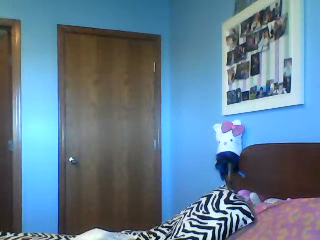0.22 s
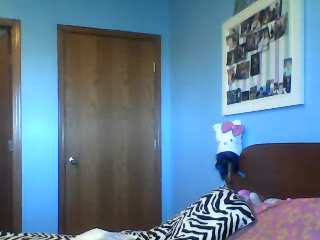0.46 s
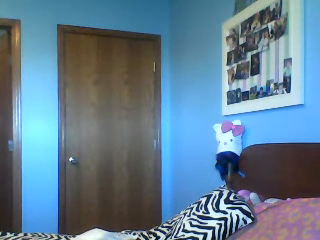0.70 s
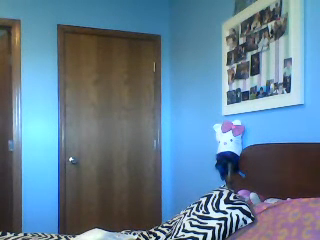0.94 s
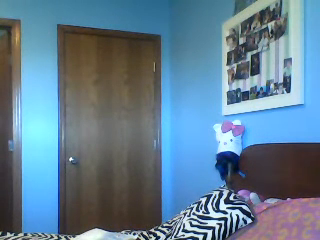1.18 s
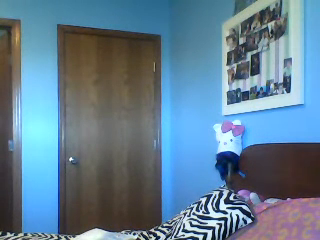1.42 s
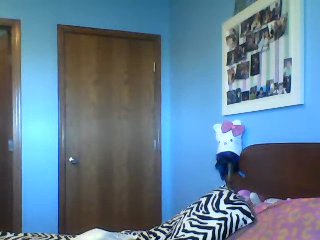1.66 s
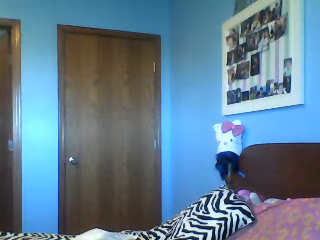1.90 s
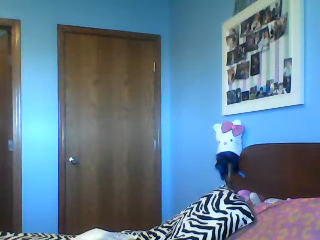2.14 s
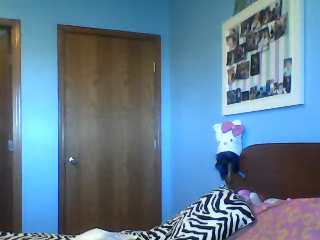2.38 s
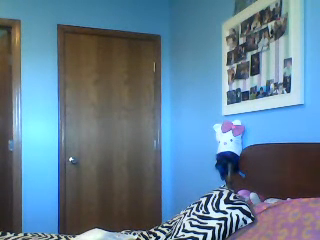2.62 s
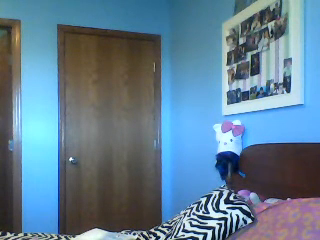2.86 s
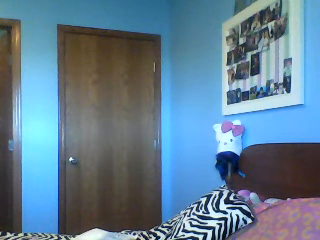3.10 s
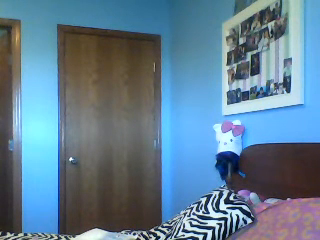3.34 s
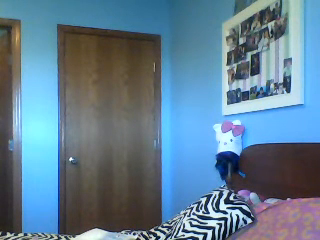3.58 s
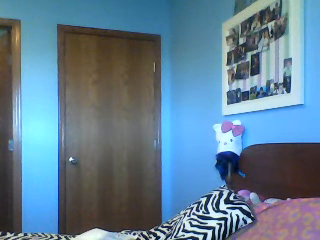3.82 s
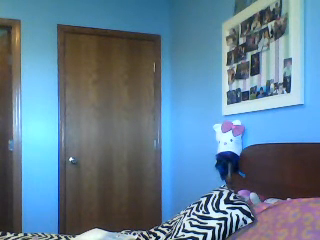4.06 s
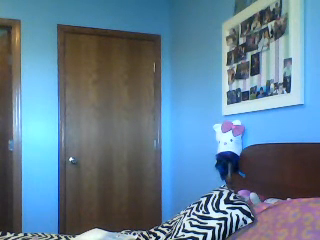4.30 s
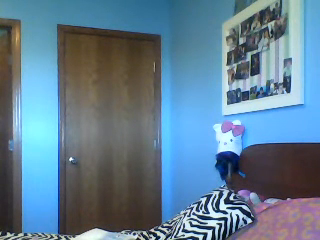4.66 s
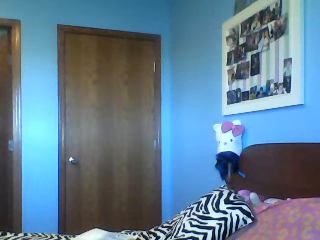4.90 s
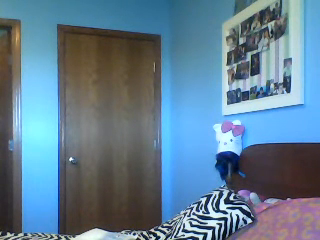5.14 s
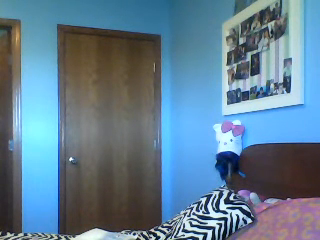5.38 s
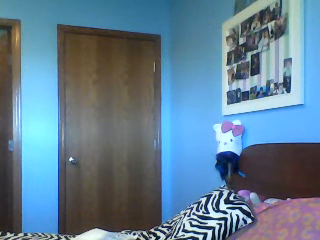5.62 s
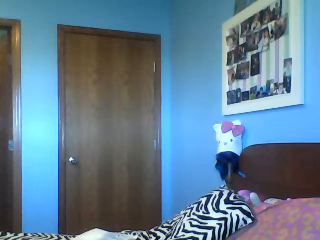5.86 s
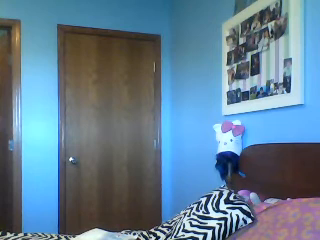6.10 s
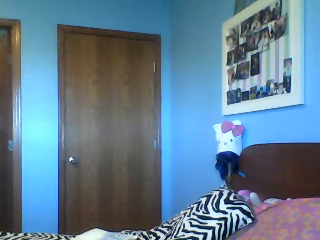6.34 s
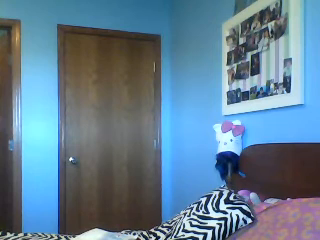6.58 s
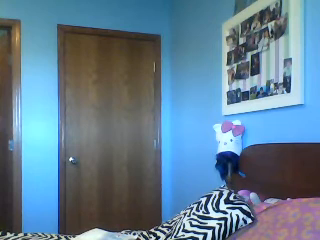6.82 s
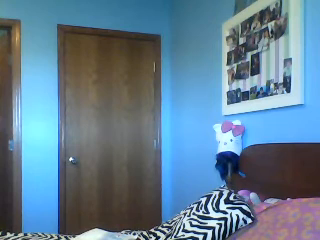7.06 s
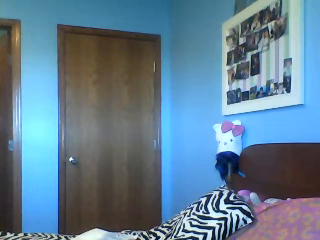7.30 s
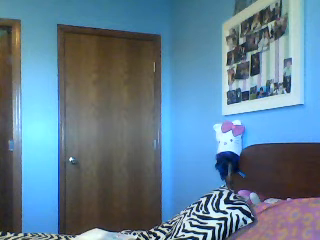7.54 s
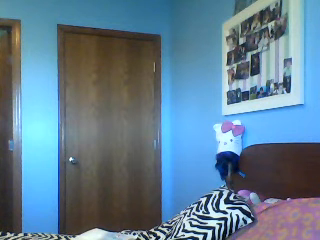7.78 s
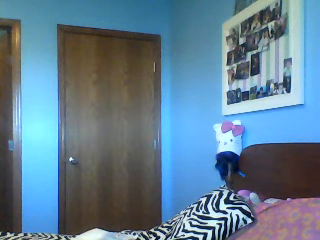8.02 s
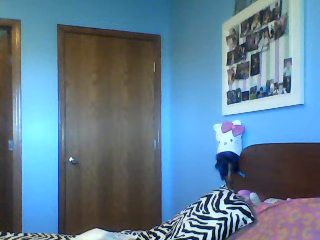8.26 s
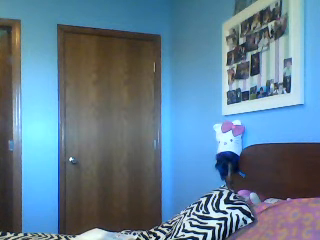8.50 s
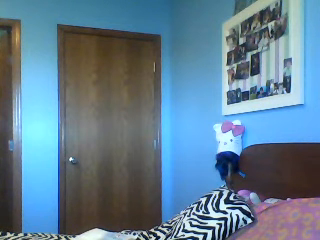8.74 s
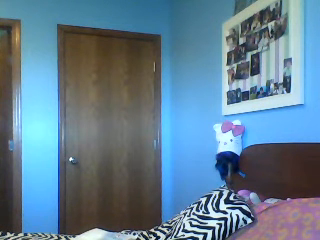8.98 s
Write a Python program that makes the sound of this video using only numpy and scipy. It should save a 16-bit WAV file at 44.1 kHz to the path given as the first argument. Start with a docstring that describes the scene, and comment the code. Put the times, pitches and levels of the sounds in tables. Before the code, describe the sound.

Soft cloth rustles over faint room hum, then hangers clack together, hooks scrape and squeal along a closet rail, with dull muffled bumps.

```python
"""Soft cloth rustles first, over faint room air and a mains hum: dresses on hangers are sorted in a closet.
Then hangers knock together, each blow ringing the body, arms and wire hook, and cushioned bumps thud.
Hooks scrape along the rail in streams of tiny slips, and creak and squeal as they stick and slip.
The rail rumbles faintly under the moving load; all is heard from the bedroom of a quiet house."""
import sys
import numpy as np
from scipy import signal
from scipy.fft import rfft, irfft, next_fast_len
from scipy.io import wavfile
from scipy.ndimage import uniform_filter1d

SR = 44100
rng = np.random.default_rng(int(sys.argv[2]) if len(sys.argv) > 2 else 0)


def transcribe(signal):
    """Save signal, clipped to [-1, 1], as a 16-bit WAV file at the path in sys.argv[1]."""
    frames = np.atleast_2d(signal).T
    limited = np.clip(frames, -1, 1)
    pcm = np.round(limited * 32767).astype(np.int16)
    wavfile.write(sys.argv[1], SR, pcm)


N = 404882
TIME = np.arange(N) / SR

# Levels in the tables are relative: each source's own gain is added to them.
# hangers knocking: (time [s], body level [dB], arms level [dB], wire hook level [dB])
KNOCKS = [(1.483, -62, -65, -48), (1.497, -47, -47, -73), (1.548, -51.5, -51, -56),
          (1.622, -48.5, -46.5, -38), (1.632, -45, -45, -39), (1.671, -46, -49, -54),
          (1.718, -49, -45.5, -48.5), (1.753, -51.5, -53, -66), (1.773, -68, -50, -51),
          (2.189, -83, -73.5, -72), (2.527, -52, -48.5, -51.5), (3.326, -85, -73, -73),
          (3.439, -72, -78, -70.5), (3.468, -51, -49.5, -51), (3.492, -50, -73, -82),
          (3.563, -46, -66, -81), (3.607, -54, -52, -73), (3.66, -52, -62, -80), (3.714, -40.5, -52, -80),
          (3.792, -56, -59, -79), (3.843, -72, -59, -77), (3.92, -45, -59, -67.5), (3.978, -69, -64.5, -77),
          (4.06, -47, -50, -40.5), (4.544, -65, -76, -72), (4.849, -53, -50.5, -68), (4.875, -53, -48, -53),
          (5.038, -77, -68.5, -75.5), (5.227, -62, -74, -80), (6.112, -68, -70, -79),
          (6.632, -75.5, -71, -84), (6.71, -74.5, -66, -77), (7.675, -75, -66, -82), (8.512, -81, -78, -72),
          (8.586, -54, -65, -68), (8.69, -59, -61, -70)]
# how a hanger's body, arms and wire hook ring: (frequency [Hz], width [Hz], level [dB])
BODY_MODES = [(1000, 150, -6.5), (1460, 150, -7), (1714, 99, 0.5), (1898, 150, -1.5), (2103, 140, -3.5)]
ARM_MODES = [(2470, 110, -2.5), (2727, 170, -1.5), (3130, 390, -5), (3610, 280, -1.5), (4020, 300, -6.5)]
HOOK_MODES = [(4400, 220, -3), (5170, 400, -4.5), (5332, 250, 0), (5740, 120, 0.5), (6110, 190, 1.5),
              (6680, 400, -0.5), (7250, 400, -6.5)]
# the rail, set ringing through the wire hook: (frequency [Hz], level [dB], time to fall 60 dB [s])
RAIL_MODES = [(1598, -13.5, .3), (1707, -11, 0.33), (2090, -14, .22), (2370, -10.5, .18)]
# hooks pushed along the rail:
# (start [s], length [s], body level [dB], arms level [dB], wire hook level [dB])
PUSHES = [(1.795, .07, -56, -57.5, -56), (2.548, .087, -48.5, -47.5, -42.5), (2.655, .04, -49, -51, -48),
          (2.757, .036, -52.5, -54, -81), (3.55, .015, -48, -56, -67), (3.612, .033, -49, -58, -80),
          (3.8, .01, -55, -60, -77), (4.033, .027, -48, -51, -75), (4.066, .035, -49.5, -54, -47),
          (4.125, .05, -51, -53, -54), (4.195, .01, -52, -53, -76), (4.258, .025, -58, -60, -79),
          (4.886, .018, -53, -55, -60), (6.999, .006, -56, -68, -80), (7.028, .066, -45, -47.5, -45)]
# how long body, arms and wire hook take to fall 60 dB once the hook stops: one time [s] each
PUSH_RELEASE_S = [.24, .11, .09]
# dry friction under the ringing: (frequency [Hz], level per Hz [dB])
FRICTION_COLOUR = [(100, -1), (300, -2.5), (550, -4.5), (800, 0.5), (1300, 0.5), (2400, -5), (3600, -13),
                   (8000, -39)]
# hook creaking with overtones, and squealing on a single mode:
# (time of the top [s], pitch [Hz], level [dB], rise to the top from 1/e [s], fall by 60 dB [s])
CREAKS = [(2.572, 903, -40, 0.03, 0.11), (2.622, 903, -43.5, 0.04, 0.25), (2.672, 883, -45.5, 0.019, 0.19),
          (2.772, 785, -51.5, 0.035, 0.12), (4.051, 917, -51, 0.014, .22)]
SQUEALS = [(1.504, 2595, -47, .008, .075), (1.858, 6677, -30.5, .04, .155), (1.932, 2750, -62, .008, .05),
           (2.578, 3668, -25.5, .02, .1), (2.625, 3658, -37, .015, .2), (2.65, 4400, -36.5, .005, .15),
           (2.772, 3820, -49.5, .032, .06), (3.556, 1830, -49.5, .034, .24), (3.558, 3720, -51, .009, .06),
           (3.613, 3680, -50, .007, .045), (3.722, 2465, -48, .007, .07), (3.846, 2600, -57, .003, .035),
           (3.926, 2460, -54, .007, .06), (4.05, 3630, -38.5, .012, .05), (4.05, 2708, -37.5, .012, .075),
           (4.072, 1820, -45.5, .027, .17), (4.074, 5210, -37.5, .006, .11), (4.135, 5520, -44, .035, .12),
           (4.14, 4970, -41, .012, .12), (4.168, 4900, -42.5, .022, .09), (4.277, 3020, -46.5, .017, .075),
           (4.283, 5980, -60, .009, .055), (4.851, 2705, -50.5, .003, .09), (4.879, 2500, -44.5, .005, .12),
           (7.038, 3680, -40.5, .007, .045), (7.039, 2720, -42.5, .009, .075),
           (7.087, 2256, -44, .007, .14), (8.603, 1630, -54, .012, .15), (8.604, 2065, -53.5, .009, .065)]
# how strongly a hanger radiates the overtones of a creak: (frequency [Hz], level [dB])
CREAK_COLOUR = [(800, 2.5), (1300, -10), (1800, -2), (2400, -0.5), (2750, -3.5), (3150, -1), (3700, -3.5),
                (4600, -19), (5450, -12), (6300, -19.5), (7300, -22.5)]
# dresses brushing past one another: (time of the top [s], level [dB], length [s])
BRUSHES = [(.26, -73, .4), (.39, -68, .3), (.57, -72, .35), (.78, -75, .2), (1.38, -71, .12),
           (2.11, -68, .25), (2.35, -70, .3), (3.35, -73, .25), (4.36, -70, .2), (4.49, -70, .25),
           (4.56, -68, .2), (4.705, -66, .18), (5.19, -70, .2), (5.59, -66, .4), (5.72, -67, .4),
           (6.135, -64, .25), (6.385, -65, .25), (6.73, -68, .2), (7.7, -67, .3), (7.96, -71, .35),
           (8.09, -68, .35), (8.53, -69, .25), (8.702, -56, .1), (8.87, -71, .3)]
# tone colour of the cloth: (frequency [Hz], level per Hz [dB])
CLOTH_COLOUR = [(200, -11.5), (700, -3.5), (1800, 3.5), (3000, 0.5), (4500, -5.5), (7000, -10),
                (9000, -13.5)]
# soft bumps of the clothes against the closet: (time [s], level [dB])
BUMPS = [(0.556, -53.5), (1.075, -53), (1.114, -55), (1.688, -43), (1.731, -48), (1.85, -45), (3.595, -46),
         (4.117, -47), (4.2, -47), (4.885, -45)]
# the load swings and the rail rumbles: (time of the top [s], level [dB], length [s])
SWINGS = [(1.18, -55, .5), (1.7, -51, .12), (1.855, -45, .1), (2.555, -45, .11), (2.82, -56, .2),
          (3.62, -46, .3), (3.8, -50, .25), (4.22, -43.5, .4), (4.6, -61, .6), (4.885, -43.5, .16),
          (7.06, -37.5, .25), (7.96, -48, .45), (9.03, -57.5, .7)]
# tone colour of that rumble: (frequency [Hz], level per Hz [dB])
SWAY_COLOUR = [(12, -16.5), (23, 1.5), (34, -5), (49, 2), (68, -11), (130, -17), (280, -22.5), (600, -47)]
# tone colour of the room air: (frequency [Hz], level per Hz [dB])
AIR_COLOUR = [(12, -31.5), (20, -1.5), (61, 0.5), (116, -4), (285, -12.5), (367, -9), (428, -13),
              (474, -12), (539, -13.5), (628, -10.5), (770, -16), (944, -15.5), (1830, -21.5),
              (6570, -35.5), (8930, -56), (11600, -88), (19600, -120)]
# steady tones of the mains hum: (frequency [Hz], rms level [dB])
HUM_TONES = [(120, -77), (240, -83), (360, -82.5), (480, -75.5)]


def knocks(body_db, arms_db, hook_db, thud_db, thud_hz, crack_db, crack_hz):
    """Each knock cracks and rings a hanger's body, arms and wire hook; the hook passes it on to the rail."""
    out = np.zeros(N + SR)
    for s, body, arms, hook in KNOCKS:
        echo = closet(low_t60=.28, high_t60=.12, split_hz=1800, direct_db=-8.5)
        contact = closet(low_t60=.17, high_t60=.1, split_hz=3000, direct_db=-2.5)
        thud = from_db(thud_db) * butter(contact, thud_hz, "low")
        crack = from_db(crack_db) * butter(contact, crack_hz, "high")
        body_ring = unit_blow(resonate(echo, uneven(BODY_MODES, spread_db=-1.0)) + thud)
        arms_ring = unit_blow(resonate(echo, uneven(ARM_MODES, spread_db=2.0)))
        hook_ring = unit_blow(resonate(echo, uneven(HOOK_MODES, spread_db=1.5)) + crack)
        blow = from_db(body + body_db) * body_ring
        blow += from_db(arms + arms_db) * arms_ring
        blow += from_db(hook + hook_db) * (hook_ring + rail_ring())
        at = round(s * SR)
        out[at:at + len(blow)] += blow
    return out[:N]


def rail_ring():
    """The rail rings in a few dying tones."""
    t, ring = TIME[:SR // 2], 0
    for hz, db, t60 in RAIL_MODES:
        tone = np.sin(2 * np.pi * (hz * t + rng.random()))
        ring = ring + np.sqrt(2) * from_db(db - 60 * t / t60) * tone
    return ring


def uneven(modes, spread_db):
    """Where a blow lands decides how strongly each mode answers; here that is left to chance."""
    return [(hz, width, db + spread_db * rng.standard_normal()) for hz, width, db in modes]


def scrapes(ring_db, friction_db, arms_db, hook_db, hiss_db, hiss_hz):
    """A sliding hook rings body, arms and wire, and rubs dryly on the rail."""
    drive, rub = grit(), grit()
    body = from_db(ring_db) * rms_one(resonate(drive, BODY_MODES))
    body += from_db(friction_db) * coloured(rub, FRICTION_COLOUR)
    arms = from_db(arms_db) * rms_one(resonate(drive, ARM_MODES))
    wire = from_db(hook_db) * rms_one(resonate(grit(), HOOK_MODES))
    wire += from_db(hiss_db) * rms_one(butter(rub, hiss_hz, "high"))
    return body * pressure(part=0) + arms * pressure(part=1) + wire * pressure(part=2)


def grit():
    """A stream of slips, blurred by the closet; the hand keeps an even pressure."""
    echo = closet(low_t60=.25, high_t60=.13, split_hz=3000, direct_db=2.5)
    stream = signal.fftconvolve(slips(per_s=650, spread_db=4.0), echo)[:N]
    mean_power = uniform_filter1d(stream ** 2, SR // 25)  # over 40 ms
    return stream / np.sqrt(mean_power + 1e-9)


def pressure(part):
    """Gain of body (0), arms (1) or wire (2): a push bites, bears down most in its middle and rings out."""
    attack_s, arch_db = .065, 1.5  # time to climb 60 dB; extra pressure in mid-push
    t, power = TIME[::40], 0
    for s, length, *parts_db in PUSHES:
        arch = arch_db * np.sin(np.pi * np.clip((t - s) / length, 0, 1))
        before = np.maximum(s - t, 0) / attack_s
        after = np.maximum(t - s - length, 0) / PUSH_RELEASE_S[part]
        gain = from_db(parts_db[part] + arch) * np.exp(-np.log(1000) * (before + after))
        power = power + gain ** 2
    return np.interp(TIME, t, np.sqrt(power))


def creaks():
    """Sticking and slipping makes a row of overtones, coloured by the hanger's resonances."""
    colour_hz, colour_db = np.transpose(CREAK_COLOUR)
    out = 0
    for s, hz, db, rise, fade in CREAKS:
        overtones = np.interp(hz * np.arange(1, 9), colour_hz, colour_db)
        out = out + stick_slip(s, hz, db, rise, fade, rough=.6, overtones_db=overtones,
                               wander_hz=4.7, flutter_rate=230)
    return out


def squeals():
    """Friction tones on one mode each: a loud one locks on to its mode, weaker ones are rougher."""
    out = 0
    for s, hz, db, rise, fade in SQUEALS:
        rough = np.clip(.04 * (-26 - db), .1, .95)  # rougher with each dB below -26
        out = out + stick_slip(s, hz, db, rise, fade, rough, overtones_db=[0],
                               wander_hz=11.0, flutter_rate=600)
    return out


def stick_slip(s, hz, db, rise, fade, rough, overtones_db, wander_hz, flutter_rate):
    """A friction tone swells, then dies ever faster; a rougher grip flutters deeper and quicker."""
    out, start = np.zeros(N), round((s - .15) * SR)
    t = TIME[start:start + SR // 2] - s
    size = len(t)
    push = swell(t, rise, fade)
    phase = 2 * np.pi * np.cumsum(hz + wander_hz * drift(70, size)) / SR
    rough = np.clip(rough, 0, 1)
    for k, overtone_db in enumerate(overtones_db, 1):
        # a complex flutter shakes both loudness and phase
        flutter = drift(flutter_rate * rough, size) + 1j * drift(flutter_rate * rough, size)
        grip = np.sqrt(1 - rough ** 2) + rough * flutter
        tone = np.real(grip * np.exp(1j * (k * phase + 2 * np.pi * rng.random())))
        out[start:start + size] += np.sqrt(2) * from_db(db + overtone_db) * push * tone
    return out


def brushing_cloth(gain_db):
    """Cloth brushes past cloth in fine grains, and stirs faintly between the brushes."""
    grains = coloured(slips(per_s=5800, spread_db=5.0), CLOTH_COLOUR)
    return from_db(gain_db) * grains * swells(BRUSHES, rise_share=.13, rest_db=-84)


def bumps(gain_db, low_hz, top_hz):
    """Cloth cushions these blows, so only a dull thud is left."""
    hits = np.zeros(N)
    for s, db in BUMPS:
        hits[round(s * SR)] = from_db(db + gain_db)
    echo = closet(low_t60=.2, high_t60=.1, split_hz=610, direct_db=-12)
    thud = butter(butter(echo, top_hz, "low"), low_hz, "high")
    return signal.fftconvolve(hits, unit_blow(thud))[:N]


def rumbling_rail(gain_db):
    """The swaying load makes the rail rumble: low noise that swells with each swing."""
    rumble = coloured(rng.standard_normal(N), SWAY_COLOUR)
    return from_db(gain_db) * rumble * swells(SWINGS, rise_share=.18, rest_db=-66)


def room_air(rms_db):
    """Steady room air: noise that is weak in the treble."""
    return from_db(rms_db) * coloured(rng.standard_normal(N), AIR_COLOUR)


def mains_hum(gain_db):
    """A faint mains hum: a few steady tones."""
    hum = 0
    for hz, db in HUM_TONES:
        tone = np.sin(2 * np.pi * (hz * TIME + rng.random()))
        hum = hum + np.sqrt(2) * from_db(db + gain_db) * tone
    return hum


def closet(low_t60, high_t60, split_hz, direct_db):
    """Echo of closet and bedroom: a direct click, then reflections that thicken, their treble dying first."""
    t = TIME[:SR // 2]
    low, high = rng.standard_normal((2, len(t)))
    echo = butter(low, split_hz, "low") * from_db(-60 * t / low_t60)
    echo += butter(high, split_hz, "high") * from_db(-60 * t / high_t60)
    echo *= 1 - np.exp(-t / .00068)
    echo /= np.sqrt(np.sum(echo ** 2))
    echo[0] += from_db(direct_db)
    return echo


def slips(per_s, spread_db):
    """Tiny slips at random moments, a few much stronger than the rest."""
    strength = from_db(spread_db * np.minimum(rng.exponential(1, N), 4))
    sizes = strength * rng.choice([-1, 1], N)
    return sizes * (rng.random(N) < per_s / SR)


def resonate(x, modes):
    """Ring several resonances side by side, with alternating signs."""
    out = 0
    for k, (hz, width, db) in enumerate(modes):
        r = np.exp(-np.pi * width / SR)
        poles = [1, -2 * r * np.cos(2 * np.pi * hz / SR), r * r]
        ring = signal.lfilter([1, 0, -1], poles, x + 1e-18)
        out = out + (-1) ** k * from_db(db) * (1 - r * r) / 2 * ring
    return out


def swell(t, rise, fade):
    """Gain that climbs to its top at t = 0, then dies ever faster."""
    return np.where(t < 0, np.exp(-(t / rise) ** 2), from_db(-60 * (np.abs(t) / fade) ** 1.3))


def swells(events, rise_share, rest_db):
    """Gain of soft movements that rise for a share of their length and fade, over a resting level."""
    t = TIME[::40]
    power = from_db(rest_db) ** 2
    for s, db, length in events:
        power = power + (from_db(db) * swell(t - s, rise_share * length, length)) ** 2
    return np.interp(TIME, t, np.sqrt(power))


def drift(rate, size):
    """Smooth chance: lines between random points, `rate` of them a second."""
    at = np.arange(size) / SR * rate
    return np.interp(at, np.arange(8000), rng.standard_normal(8000))


def coloured(x, spectrum):
    """Give a steady signal a tone colour; rms 1."""
    hz, db = np.transpose(spectrum)
    size = next_fast_len(N)
    grid = np.maximum(np.arange(size // 2 + 1) * SR / size, 1)
    gain = from_db(np.interp(np.log(grid), np.log(hz), db))
    return rms_one(irfft(rfft(x, size) * gain, size)[:N])


def butter(x, hz, kind, order=2):
    """Keep what lies below ("low") or above ("high") a frequency."""
    return signal.sosfilt(signal.butter(order, min(hz, .45 * SR), kind, fs=SR, output="sos"), x)


def unit_blow(x):
    """Scale a ring to rms 1 over its first 25 ms."""
    return x / np.sqrt(np.mean(x[:SR // 40] ** 2))


def rms_one(x):
    """Scale to rms 1."""
    return x / np.sqrt(np.mean(x ** 2) + 1e-20)


def from_db(db):
    """Decibels to gain."""
    return 10 ** (np.asarray(db) / 20)


def scene():
    """All sources, one channel."""
    hangers = knocks(body_db=-6.0, arms_db=-4.5, hook_db=2.0,
                     thud_db=-15, thud_hz=900, crack_db=-7, crack_hz=4510)
    sliding = scrapes(ring_db=-6.0, friction_db=-2.0, arms_db=1.5,
                      hook_db=-0.5, hiss_db=7.5, hiss_hz=3813)
    squeaks = creaks() + squeals()
    clothes = brushing_cloth(gain_db=-2.5) + bumps(gain_db=-10.5, low_hz=110, top_hz=407)
    background = rumbling_rail(gain_db=-4.0) + room_air(rms_db=-65.5) + mains_hum(gain_db=-1.5)
    return (hangers + sliding + squeaks + clothes + background)[None]


def record(dry):
    """A small microphone whose treble rolls off steeply."""
    dull = butter(dry, 7396, "low", order=14)
    cutoff = signal.ellip(10, .1, 80, 9000, fs=SR, output="sos")  # ripple dB, rejection dB, Hz
    return signal.sosfilt(cutoff, dull)


dry = scene()
out = record(dry)
transcribe(out)
```